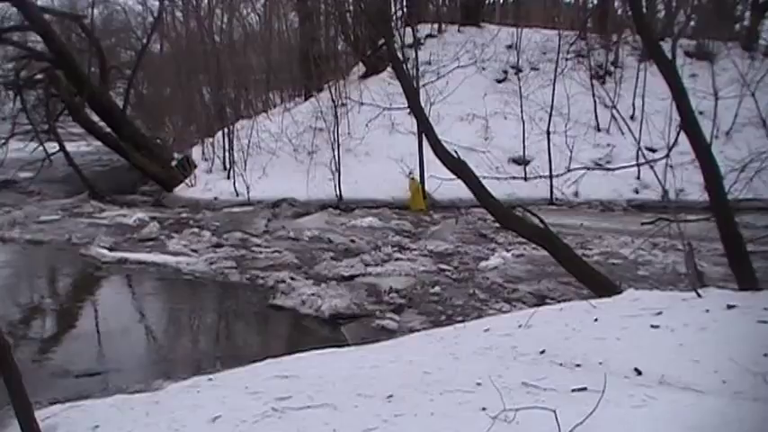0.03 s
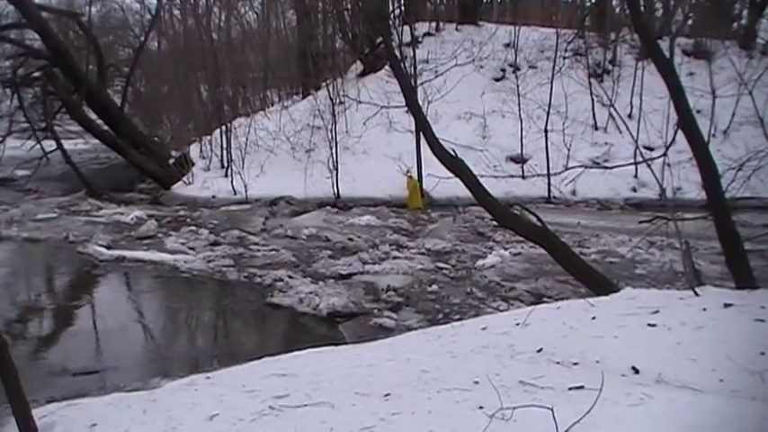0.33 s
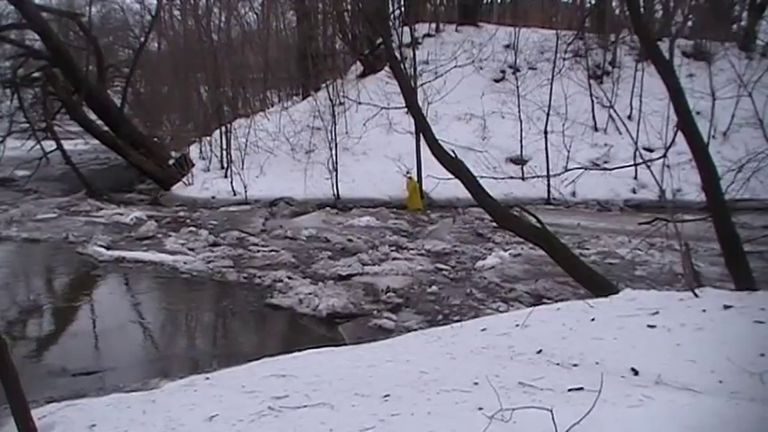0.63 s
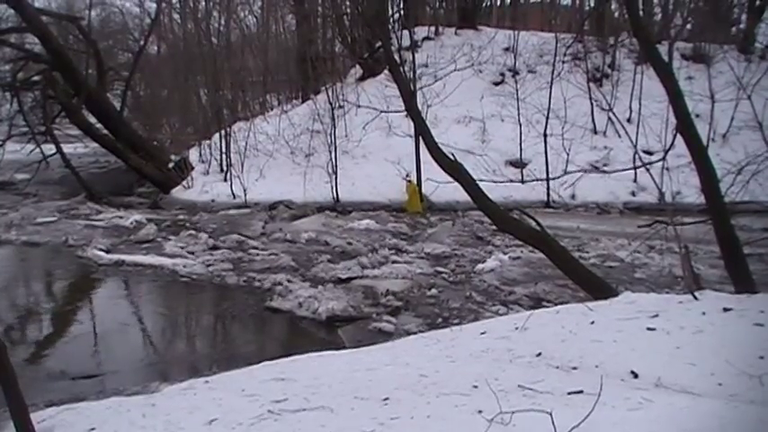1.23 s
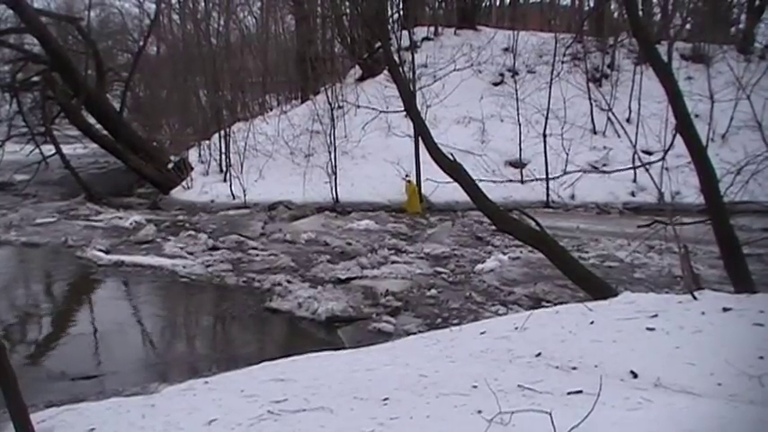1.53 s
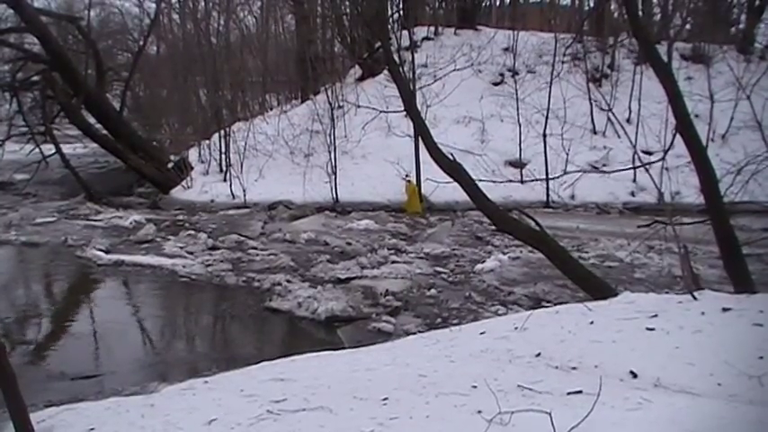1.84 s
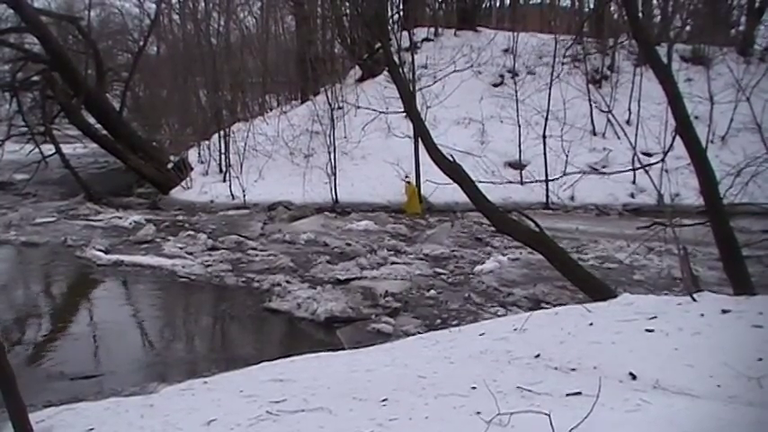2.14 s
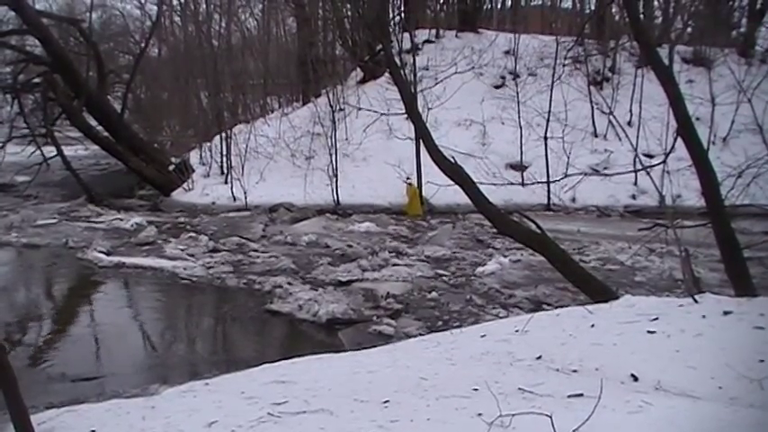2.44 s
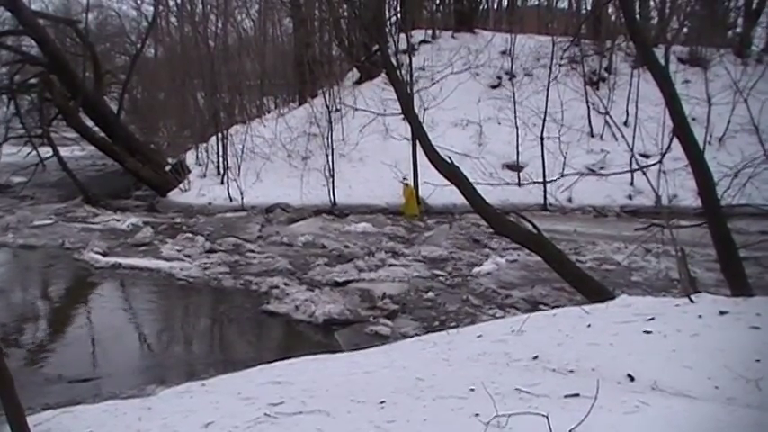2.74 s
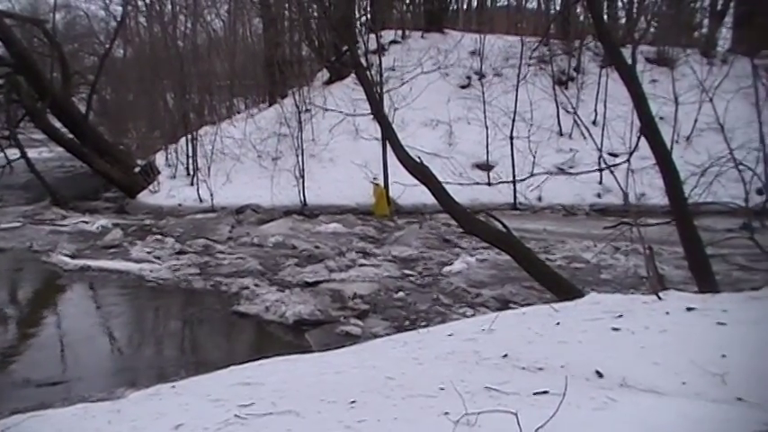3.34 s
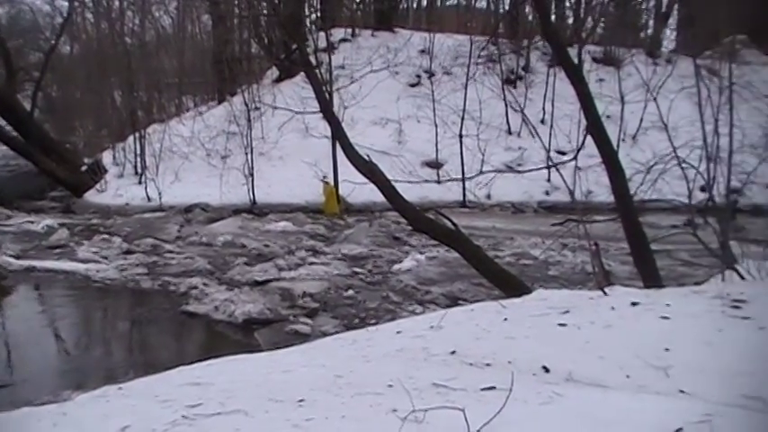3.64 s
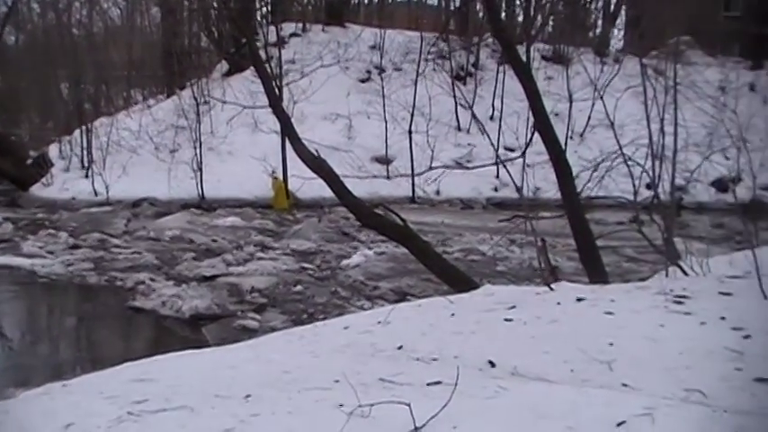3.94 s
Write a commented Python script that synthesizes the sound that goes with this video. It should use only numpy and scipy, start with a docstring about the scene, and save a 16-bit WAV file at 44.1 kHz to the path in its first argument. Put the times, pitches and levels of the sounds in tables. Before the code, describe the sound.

A river rushes steadily for the whole four seconds, churning and bubbling under a smooth hiss. Small birds give faint, thin chirps with a slight echo, clearest around 0.7, 2.2 and 3.9 seconds. The hand-held camera whines very faintly and its case ticks a few times, with one sharper click near 2 seconds. From about 3 seconds, fingers and a sleeve brush softly against it.

```python
"""From the first moment an ice-laden river rushes between snowy, wooded banks, heard from up the bank:
churning, bubbling water under a smooth hiss, with the faint whine of a hand-held camera beside it.
Right away small birds start giving thin, rising calls that scatter among the trunks.
Then fingers rustle on the camera and its case clicks, loudest near two seconds.
Towards the end a sleeve brushes softly as the camera turns."""
import sys
import numpy as np
from scipy import signal
from scipy.io import wavfile

SR = 44100
rng = np.random.default_rng(int(sys.argv[2]) if len(sys.argv) > 2 else 0)


def wav_out(sig):
    """Save sig, one row per channel (or a flat mono array), as 16-bit PCM at SR to the path in sys.argv[1]."""
    wavfile.write(sys.argv[1], SR, np.round(np.clip(np.atleast_2d(sig).T, -1, 1) * 32767).astype(np.int16))


N = 176400
TIME = np.arange(N) / SR

# Stereo width of the noise layers. Each row: frequency in Hz, likeness of the ears from 0 to 1.
EAR_LIKENESS = [(60, .92), (270, .9), (740, .87), (1220, .8), (2010, .58), (3330, .17), (5500, .03),
                (15000, 0.0)]
# Their lean to one side. Each row: frequency in Hz, left minus right in dB.
EAR_BALANCE = [(200, -1.9), (380, -2.3), (700, -0.27), (1290, 0.0), (2380, -1.8), (4400, -1.7),
               (15000, -1.0)]
# Colour of the rushing water. Each row: frequency in Hz, relative noise density in dB.
RUSH_COLOUR = [(25, -44), (40, -40), (52, -38), (65, -27), (83, -18.5), (105, -21), (135, -18.5),
               (172, -11), (200, -12.5), (260, -6), (330, -6), (450, -4.5), (620, -1.13), (830, -0.1),
               (1000, -2.5), (1400, -9), (1700, -14.5), (2000, -17.5), (2600, -24.5), (3200, -30),
               (4200, -36), (6000, -48)]
# Hollow notes of the churning. Each row: pitch in Hz, width in Hz, level against the rush in dB.
WATER_HOLLOWS = [(822, 45, -14), (176, 12, -23.5), (87, 10, -35)]
# Fader ride on the whole river. Each row: time in seconds, gain in dB.
FLOW_RIDE = [(.1, -45.5), (.3, -45.5), (.5, -45.5), (.72, -46), (1.05, -45.5), (1.15, -45), (1.33, -46),
             (1.57, -44.5), (1.76, -45.5), (1.88, -45), (2.2, -45.5), (2.46, -46), (2.7, -45.7),
             (2.92, -45), (3.05, -46), (3.47, -45.5), (3.78, -45), (3.93, -45)]
# Contour whose swings against the flow ride move the mids. Each row: time in seconds, level in dB.
MID_SURGE = [(.2, -47), (.4, -46), (.51, -44), (.74, -46), (.9, -45.5), (1.02, -45.8), (1.29, -43),
             (1.57, -45), (1.78, -44.5), (1.88, -45), (2.47, -46), (2.78, -45), (2.93, -44.6), (3.1, -46.5),
             (3.48, -44.5), (3.79, -46.5), (3.92, -45)]
# Colour of the high hiss. Each row: frequency in Hz, relative noise density in dB.
HISS_COLOUR = [(1500, -8), (3500, 0.5), (5500, 0), (7000, -1.5), (8700, -4.5), (10500, -6), (13000, -11),
               (15500, -13)]
# Bird calls. Each row: start in seconds, length in seconds, top pitch in Hz, rise in Hz, swell in dB,
# level at the top before the direct and echo gains in dB, left minus right in dB.
BIRD_CALLS = [(0.06, 0.054, 6650, 250, 6, -65, 5), (0.148, 0.058, 3350, 202, 4, -68, 2),
              (0.313, 0.084, 3380, 200, 4, -70.5, 0), (0.688, 0.068, 7670, 430, 2, -59.5, -1),
              (.885, .025, 7250, 750, 4, -75, 0), (1.228, 0.034, 7500, 800, 2, -75, 2),
              (1.851, 0.054, 2890, 120, 6, -66, 3), (2.233, 0.034, 7900, 950, 13, -53.5, 2),
              (3.392, .06, 7000, 750, 2, -76, 0), (3.67, 0.039, 7670, 400, -1, -66.5, 2),
              (3.888, 0.032, 7920, 900, 8, -55, 2)]
# Spells of the focus motor. Each row: start in seconds, end in seconds.
FOCUS_SPELLS = [(.09, .41), (1.35, 1.66), (1.84, 1.95), (2.35, 2.46), (2.83, 2.94), (3.35, 3.45),
                (3.83, 3.93)]
# Fingers sliding on the case. Each row: peak in seconds, half width in seconds, level in dB.
FINGER_SLIDES = [(.18, .01, -74), (0.297, .01, -78), (1.01, 0.027, -77), (1.543, .07, -80),
                 (2.08, 0.044, -73), (3.175, 0.037, -69), (3.42, .04, -80), (3.633, 0.076, -72),
                 (3.81, 0.038, -68), (3.896, .02, -71)]
# Colour of their friction. Each row: frequency in Hz, relative noise density in dB.
FINGER_COLOUR = [(1500, 2), (3500, 4), (5000, -2), (7000, 1.5), (9000, 2.5), (11000, -7), (15000, -23)]
# Clicks of the case. Each row: start in seconds, strength of the hit in dB.
CASE_HITS = [(.6398, -55), (1.4654, -58), (1.9592, -40.5), (2.4215, -59), (2.7785, -59), (2.789, -60),
             (3.391, -58)]
# Notes the case rings with. Each row: pitch in Hz, gain in dB, seconds to fade by 60 dB.
CASE_MODES = [(4850, -6, 0.0056), (5600, -2.5, 0.0043), (6400, -12, .004), (7900, -6, .003),
              (8700, -8, 0.0044), (9600, -29, .003)]
# Its dense after-ring. Each row: low and high edge in Hz, gain in dB, seconds to fade by 60 dB.
CASE_AFTER_RING = [(7900, 9300, -27, .21), (4700, 6200, -27, .12)]
# Colour of the brushing cloth. Each row: frequency in Hz, relative noise density in dB.
SLEEVE_COLOUR = [(1500, 5), (3000, 5.5), (4500, -3), (6000, -6), (9000, -19)]


def from_db(db):
    """Decibels to gain."""
    return 10 ** (np.asarray(db) / 20)


def unit_rms(x):
    """Scale to rms 1."""
    return x / np.sqrt(np.mean(x ** 2) + 1e-20)


def at_hz(points, hz):
    """Read a table on a log-frequency axis."""
    hzs, values = np.transpose(points)
    return np.interp(np.log(hz), np.log(hzs), values)


def pan(db):
    """Left and right gains; positive dB leans left."""
    return from_db(np.array([[db], [-db]]) / 2)


def drift(rate_hz):
    """Smooth random wander of spread 1."""
    pole = np.exp(-80 * np.pi * rate_hz / SR)
    slow = signal.lfilter([1], [1, -2 * pole, pole * pole], rng.standard_normal(N // 40 + 2002))[2000:]
    return np.interp(np.arange(N) / 40, np.arange(len(slow)), unit_rms(slow))


def band(x, low_hz, high_hz, order=2):
    """Butterworth band-pass."""
    edges = [low_hz, min(high_hz, .45 * SR)]
    return signal.sosfilt(signal.butter(order, edges, "band", fs=SR, output="sos"), x)


def ring(hits, hz, t60):
    """A resonator: a unit hit sets off a fading sine of height 1."""
    r, w = np.exp(-np.log(1000) / (t60 * SR)), 2 * np.pi * hz / SR
    return signal.lfilter([0, np.sin(w)], [1, -2 * r * np.cos(w), r * r], hits + 1e-18)


def coloured_noise(colour, flicker_db):
    """Stereo noise of rms 1, in third-octave bands that each flicker on their own."""
    out, edges = 0, 22 * 2 ** (np.arange(30) / 3)
    white = rng.standard_normal((2, 2, N))
    for k, (low, high) in enumerate(zip(edges, edges[1:])):
        hz, flicker = np.sqrt(low * high), drift(11)
        if high < colour[0][0] or low > colour[-1][0]:
            continue
        mid, side = band(white[k % 2], low, high)
        alike = at_hz(EAR_LIKENESS, hz)
        gain = from_db(at_hz(colour, hz) + flicker_db * flicker) * pan(at_hz(EAR_BALANCE, hz))
        out = out + gain * (np.sqrt(1 + alike) * mid + np.sqrt(1 - alike) * side * [[1], [-1]])
    return unit_rms(out)


def bubbles(per_s=1000, cycles=24, low_hz=424, high_hz=1208, spread_db=1.5):
    """Countless distant bubbles, each a short ping at one of twenty pitches."""
    strengths = from_db(spread_db * np.minimum(rng.exponential(1, N), 4)) * rng.choice([-1, 1], N)
    births = strengths * (rng.random(N) < per_s / SR)
    pitches, pitch_index = np.geomspace(low_hz, high_hz, 20), rng.integers(0, 20, N)
    pings = sum(ring(births * (pitch_index == k), hz, cycles / hz) for k, hz in enumerate(pitches))
    return unit_rms(band(pings, low_hz / 2, high_hz * 2))


def hollows():
    """The churning water drones in a few hollow resonances."""
    out = 0
    for hz, width_hz, db in WATER_HOLLOWS:
        drone = ring(rng.standard_normal(N), hz, t60=np.log(1000) / (np.pi * width_hz))
        out += from_db(db) * unit_rms(band(drone, hz - 2 * width_hz, hz + 2 * width_hz))
    return out


def river(surge_depth=1.3, right_lag_s=.00004):
    """Rush, bubbles and drone swell with the flow, while the mids surge on their own."""
    water = coloured_noise(RUSH_COLOUR, flicker_db=.57) + from_db(-13) * bubbles() + hollows()
    flow_db = np.interp(TIME, *np.transpose(FLOW_RIDE))
    surge_db = np.interp(TIME, *np.transpose(MID_SURGE)) - flow_db
    mid_lift = from_db(surge_depth * (surge_db - np.mean(surge_db))) - 1
    mids = band(water, 600, 1090, order=1)
    left, right = (water + mid_lift * mids) * from_db(flow_db)
    return np.array([left, np.interp(TIME - right_lag_s, TIME, right)])


def hiss():
    """A smooth bed of high noise above the river."""
    return from_db(-73) * coloured_noise(HISS_COLOUR, flicker_db=1)


def camera_whine(whine_hz=2187.5, focus_hz=10697, waver_hz=1.87, ramp_s=.02):
    """A faint steady tone, joined by a much higher one while the focus motor runs."""
    def tone(hz):
        return np.sqrt(2) * np.sin(2 * np.pi * np.cumsum(hz + waver_hz * drift(6.1)) / SR)
    running = sum(np.clip(np.minimum(TIME - start, end - TIME) / ramp_s, 0, 1)
                  for start, end in FOCUS_SPELLS)
    whine = from_db(-76.5) * pan(-6) * tone(whine_hz)
    motor = from_db(-95) * pan(-8) * running * tone(focus_hz)
    return whine + motor


def birds(attack_s=.003, release_s=.0054, flick_hz_per_s=300000):
    """Each call is a fluttering whistle that arches up to its top pitch and flicks down as it stops."""
    out = np.zeros((2, N))
    waver_hz, flutter_db = 59 * drift(152), 2.5 * drift(110)
    for start, length, top_hz, rise_hz, swell_db, db, pan_db in BIRD_CALLS:
        t = TIME - start
        below_top = (1 - np.clip(t / length, 0, 1)) ** 1.5
        flick_hz = flick_hz_per_s * np.clip(t - length, 0, release_s)
        hz = top_hz - rise_hz * below_top - flick_hz + waver_hz
        envelope = np.clip(t / attack_s, 0, 1) * np.clip(1 + (length - t) / release_s, 0, 1)
        gain = pan(pan_db) * from_db(db - swell_db * below_top + flutter_db)
        out += gain * envelope * np.sin(2 * np.pi * np.cumsum(hz) / SR)
    return out


def among_trunks(calls, echoes_per_s=1400, t60=.56, direct_db=-4.5, echo_db=-2.5):
    """The direct sound plus a dying scatter of echoes off the trunks, different at each ear."""
    echoes = rng.standard_normal((2, SR)) * (rng.random((2, SR)) < echoes_per_s / SR)
    echoes *= from_db(-60 * TIME[:SR] / t60)
    echoes /= np.sqrt(np.sum(echoes ** 2, axis=1, keepdims=True))
    scattered = signal.fftconvolve(calls, echoes, axes=1)[:, :N]
    return from_db(direct_db) * calls + from_db(echo_db) * scattered


def finger_rubs():
    """Fingers slide on the case in soft, grainy swells of friction."""
    pressure = sum(from_db(db) * np.exp(-.5 * ((TIME - peak) / half_width) ** 2)
                   for peak, half_width, db in FINGER_SLIDES)
    grain = from_db(2.6 * drift(120))
    return pressure * unit_rms(grain * coloured_noise(FINGER_COLOUR, flicker_db=1))


def case_clicks(rebound_s=.0008, rebound_db=-18, snap_band_hz=(4770, 10900)):
    """The plastic case snaps, rebounds once and leaves a brief noisy ring."""
    hits, t = np.zeros(N), TIME[:SR // 4]
    for start, db in CASE_HITS:
        hits[int(start * SR)] += from_db(db)
        hits[int((start + rebound_s) * SR)] += from_db(db + rebound_db)
    body = sum(from_db(db) * ring(hits, hz, t60) for hz, db, t60 in CASE_MODES)
    snap = band(band(body, *snap_band_hz), *snap_band_hz)
    tail = 0
    for low, high, db, t60 in CASE_AFTER_RING:
        noise = unit_rms(band(rng.standard_normal((2, len(t))), low, high))
        tail += from_db(db - 60 * t / t60) * noise
    return snap + signal.fftconvolve(hits[None], tail, axes=1)[:, :N]


def sleeve(peak_s=3.5, half_width_s=1):
    """A sleeve brushes by in one slow swell of cloth noise."""
    swell = np.exp(-.5 * ((TIME - peak_s) / half_width_s) ** 2)
    return from_db(-68.5) * swell * coloured_noise(SLEEVE_COLOUR, flicker_db=4)


def scene():
    """Hiss, river and birds, with the small noises of the camera and the hand that holds it."""
    outdoors = hiss() + river() + among_trunks(birds())
    return outdoors + case_clicks() + finger_rubs() + sleeve() + camera_whine()


def record(dry, start_s=.0813, fade_s=.0047, stop_hz=16100):
    """The sound snaps on after a moment of silence; a steep low-pass takes off the very top."""
    fade_in = np.clip((TIME - start_s) / fade_s + .5, 0, 1)
    return signal.sosfilt(signal.cheby2(20, 60, stop_hz, fs=SR, output="sos"), dry * fade_in)


dry = scene()
out = record(dry)
wav_out(out)
```